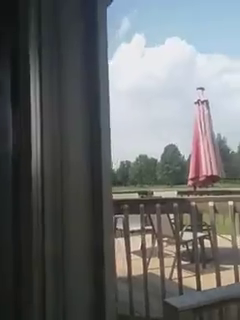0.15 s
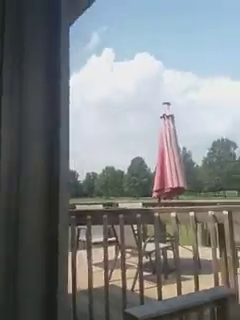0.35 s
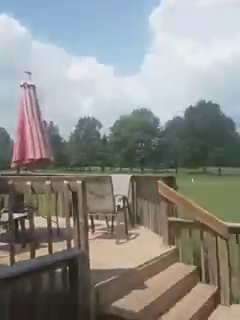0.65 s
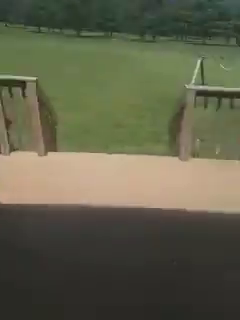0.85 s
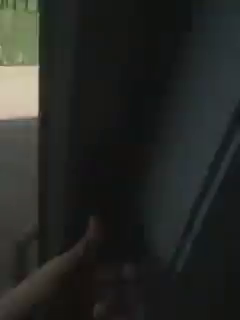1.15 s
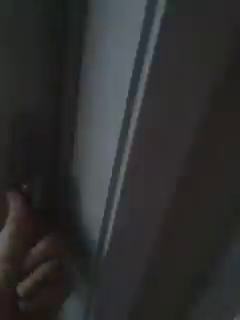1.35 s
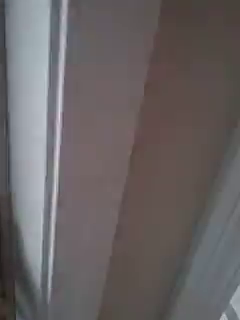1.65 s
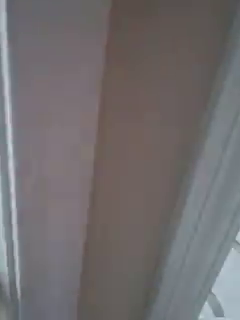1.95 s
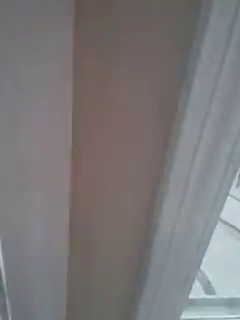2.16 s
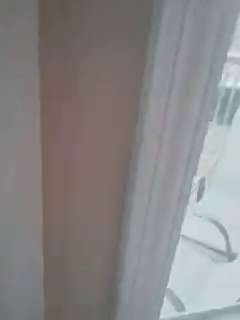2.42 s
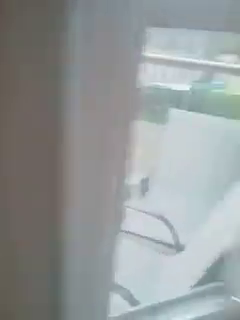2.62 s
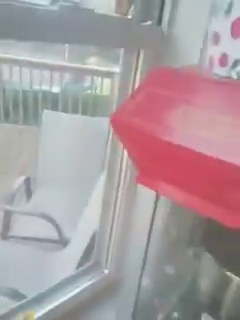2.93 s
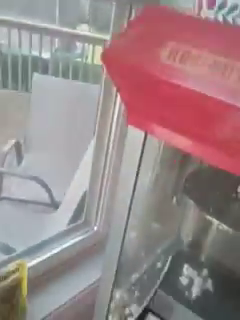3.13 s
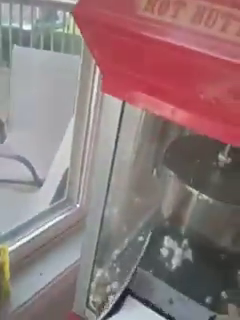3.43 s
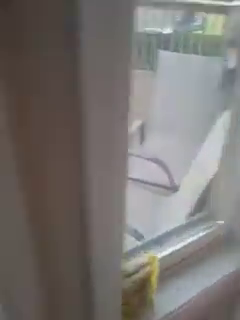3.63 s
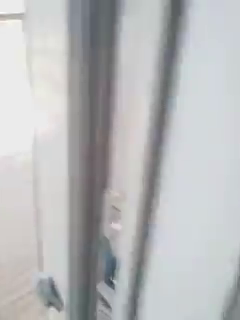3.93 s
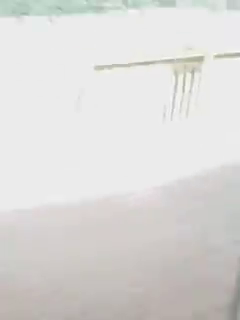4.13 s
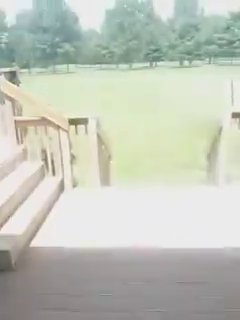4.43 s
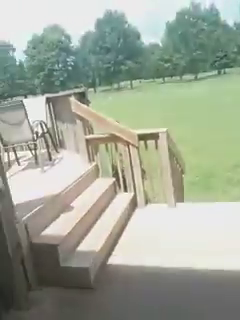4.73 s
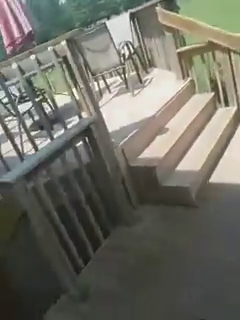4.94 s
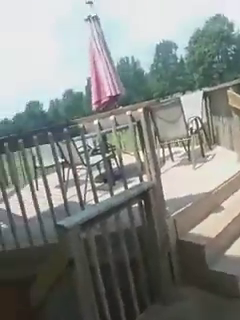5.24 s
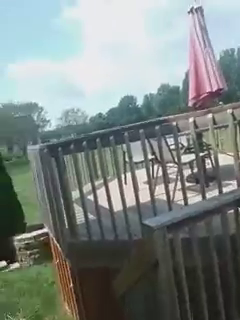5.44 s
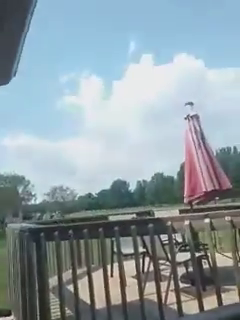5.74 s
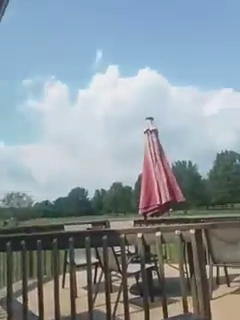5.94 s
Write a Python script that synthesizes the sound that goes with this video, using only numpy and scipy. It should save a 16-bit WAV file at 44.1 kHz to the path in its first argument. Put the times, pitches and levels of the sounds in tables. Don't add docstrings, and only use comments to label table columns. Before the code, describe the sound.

Handheld, close stereo microphone in a furnished room with low hum and hiss. A sleeve swishes and fingers click at a latch; a sliding glass door bangs into its frame, the pane booming before the latch catches and the sound is cut off. After a pause it is pushed, cracks free, rolls grittily with low jolts, and squeaks against a rubber bumper. Outside, faint leaves, twig ticks and soft wind thumps follow.

```python
import sys
import numpy as np
from scipy import signal
from scipy.fft import rfft, irfft
from scipy.io import wavfile
from scipy.ndimage import uniform_filter1d

SR = 44100
rng = np.random.default_rng(int(sys.argv[2]) if len(sys.argv) > 2 else 0)


def magnitude_from_level(level_db):
    exponent = np.asarray(level_db, float) / 20
    return 10 ** exponent


def output_pcm(signal):
    pcm = np.clip(np.atleast_2d(signal).T, -1, 1) * 32767
    wavfile.write(sys.argv[1], SR, np.round(pcm).astype(np.int16))


N = 267907
TIME = np.arange(N) / SR

# (frequency [Hz], density [dB/Hz])
AIR_SPECTRUM = [(18, -49), (30, -21.5), (124, -4.5), (227, -7.5), (252, -18.5), (295, -7), (384, -13),
                (449, -15), (702, -17.5), (1070, -18), (2410, -22.5), (3060, -32.5), (14800, -32),
                (16000, -34.5)]
# (frequency [Hz], level [dB])
RUSTLE_SPECTRUM = [(600, -20), (1200, -3), (2500, -0.5), (3600, -5), (4700, -3.5), (6500, -12),
                   (12000, -35)]
# (frequency [Hz], level [dB])
WHINES = [(13001, -96), (14002, -96), (14998, -85)]
# (frequency [Hz], left-right likeness [-1..1])
LIKENESS = [(60, 0.75), (180, 0.99), (550, 0.28), (1650, -0.11), (4970, -0.0085), (15000, -0.092)]
# (frequency [Hz], left-right difference [dB])
BALANCE = [(60, 3), (150, -1.0), (380, 0.5), (950, -2), (2380, -4), (5980, 0), (15000, 1)]
# (frequency [Hz], level [dB])
CLICK_SPECTRUM = [(530, -37.5), (900, -0.5), (1450, -1.5), (2000, 0), (3090, 0), (3780, -5), (4450, -2),
                  (5900, -11.5), (7210, -21.5), (9000, -32), (11700, -33), (19800, -120)]
# (frequency [Hz], t60 [s])
ROOM_T60 = [(100, .7), (300, 0.32), (1000, 0.76), (3000, 0.38), (8000, 0.4), (16000, 0.85)]
# (frequency [Hz], width [Hz], level [dB])
PANE_MODES = [(175, 72, 2), (240, 58, 0.5), (302, 21, 1.5), (375, 13, -3.5), (404.6, 11.6, -0.5),
              (483, 27, -3.5), (640, 150, -7.5)]
# (frequency [Hz], width [Hz], level [dB])
DEEP_MODES = [(53.2, 18.6, -19), (85, 23, -2), (121.4, 17.6, 0.5)]
# (frequency [Hz], level [dB])
TRACK_SPECTRUM = [(380, -29), (640, -7.5), (801, -3), (1030, -2.5), (1110, -3.5), (1480, -8), (1920, -8),
                  (2530, -9), (3600, -23.5), (4680, -31), (7920, -120)]
# (frequency [Hz], level [dB])
SEAL_SPECTRUM = [(1880, -11), (3200, -1), (3350, 0.5), (4470, 2.5), (6080, -4), (6710, -12), (8500, -32),
                 (11000, -63), (18700, -120)]
# (frequency [Hz], level [dB])
THIN_SPECTRUM = [(7000, 4.5), (9000, 2), (16000, -1)]
# (frequency [Hz], level [dB])
BUMPER_SPECTRUM = [(600, -20), (850, -1), (1650, -9.5), (2500, 0), (3300, -13), (4100, -11), (5100, -8),
                   (5900, -30), (6600, -20), (7400, -34), (8000, -27), (10000, -40)]
# (frequency [Hz], level [dB])
DRAG_SPECTRUM = [(350, -25), (600, -10), (882, -2), (2040, -2), (2230, -2.5), (2650, -5.5), (4070, -7),
                 (9000, -36.5), (11700, -57), (19800, -120)]
# (frequency [Hz], level [dB])
WIND_SPECTRUM = [(30, -3), (60, 0.5), (130, -0.5), (250, -9.5), (450, -18), (800, -34), (2000, -53)]

# (start [s], level [dB], fade t60 [s], treble above it [dB])
SWISHES = [
    (.63, -63, 2.7, -4),
    (.95, -73, 1.9, 6.5),
    (1.25, -66.5, 2.4, -18),
    (3.06, -66, 1.4, -3),
    (5.15, -75, 1.4, 8),
    (5.65, -86, 3, -6),
]
# (start [s], level above hum [dB], fade t60 [s])
HUM_SWELL = [
    (5.78, 8.9, 9),
]
# (time [s], peak [dB], ring [Hz], hardness [dB], left-right [dB])
LATCH = [(0.5043, -43, 2680, -36, -21), (0.5606, -24, 2200, -34.5, -37), (0.5713, -44, 2830, -24, -22),
         (1.1475, -37.5, 4550, -36, 2), (1.226, -42.5, 2570, -17, -2), (1.307, -39.5, 3040, -21, 5),
         (1.3399, -39, 3000, -25, -1), (1.5031, -27, 1880, -41.5, -3), (1.509, -26, 4230, -30, 23),
         (1.5178, -30.5, 1700, -28, -1), (1.5597, -44.5, 1900, -25, -4), (1.6034, -33, 3200, -29.5, -17),
         (1.6095, -25, 1630, -13.5, -2), (1.6608, -30, 4700, -21, 16), (1.6876, -31, 2820, -27, -1),
         (1.7304, -30.5, 2740, -20.5, 0), (1.776, -27.5, 2560, -21.5, -2.5), (1.7885, -31.5, 2380, -35, -7)]
# (time [s], peak [dB], ring [Hz], hardness [dB], left-right [dB])
SLAM = [
    (1.9165, -30, 2860, -20.5, -5),
    (1.952, -5, 2770, -36, -6),
    (1.9568, -18, 1940, -11.5, 23),
    (1.9946, -17, 2030, -33, -2.5),
]
# (time [s], peak [dB], ring [Hz], hardness [dB], left-right [dB])
CATCH = [
    (2.0945, -11.5, 1940, -49, -5.5),
    (2.103, -29, 1940, -20, -2),
    (2.1169, -25, 1970, -36, 14),
    (2.201, -28.5, 2362, -52, -1),
    (2.372, -41.5, 2800, -21, 5),
]
# (time [s], peak [dB], ring [Hz], hardness [dB], left-right [dB])
RAIL = [
    (3.0684, -28.5, 1810, -13, -3),
    (3.358, -40, 1580, -40, -2),
    (3.4803, -26, 2220, -14, 14),
    (3.4871, -21, 2400, -24, 1.5),
    (3.5009, -19.5, 1600, -19, 0),
    (3.5687, -18, 5000, -20, -8),
    (3.5774, -23.5, 2130, -11, 3.5),
    (4.1342, -24.5, 1920, -29, 4),
    (4.2322, -30, 3900, -8, -3),
    (4.3331, -29, 3000, -27, 0.5),
]
# (time [s], peak [dB], ring [Hz], hardness [dB], left-right [dB])
DECK = [
    (4.7523, -36.5, 2790, -15, -16),
    (4.9425, -27.5, 2970, -20, -11),
    (5.474, -42.5, 4000, -26, -9),
]
ROOM_SEND_DB = [-13.5, -4, -20.5, -4]
# (time [s], peak [dB], frequency [Hz], t60 [s], left-right [dB])
RINGS = [(.568, -47, 2600, 0.026, -19), (.577, -44, 3300, 0.027, -15), (1.66, -47, 2310, 0.015, 0),
         (1.792, -41, 708, 0.057, 1), (1.806, -44.5, 960, 0.042, 4), (1.917, -44.5, 700, 0.056, -2),
         (1.9525, -17, 5700, 0.015, -1), (1.953, -23, 4600, .03, 0), (1.956, -22, 3030, .025, -7),
         (1.957, -21, 1047, 0.036, 0.5), (1.968, -27, 4500, .02, 0), (1.978, -27, 4000, 0.024, 0),
         (1.995, -24, 4770, 0.023, 0), (2.094, -22, 2820, 0.013, -7), (2.102, -31, 1980, .03, -4),
         (2.105, -35, 4760, .02, 2), (2.131, -27.5, 1880, 0.027, -6), (2.132, -40, 3000, 0.018, 0),
         (3.07, -40, 4770, 0.017, 0.5), (3.069, -41, 3890, 0.017, -4), (3.07, -44.5, 6400, .015, 1),
         (3.073, -46, 4740, .02, 0), (3.085, -48.5, 194, .2, 0), (3.496, -29, 890, 0.085, 1),
         (3.682, -37, 1100, .04, -6), (3.735, -33, 1034, 0.049, 1), (3.795, -36, 1100, .08, -4),
         (3.827, -25.5, 1073, 0.065, -6), (3.887, -42, 1110, .04, -6), (3.9, -32, 334, 0.11, -3),
         (3.922, -30, 295, .12, -2), (3.985, -29.5, 254, .08, -1), (4.07, -31, 980, .04, -4),
         (4.075, -34, 403, .08, -2), (4.135, -26.5, 957, 0.045, -4), (4.232, -35.5, 2216, .05, -3),
         (5.22, -54, 1710, .04, 1), (1.34, -49, 790, 0.026, 0), (1.39, -52, 800, 0.035, 0),
         (1.43, -51, 900, 0.025, 0), (1.953, -22.5, 6400, 0.019, -5.5)]
# (start [s], boom [dB], fade t60 [s], deepest modes above it [dB])
JOLTS = [(1.505, -56.5, 2.2, -15), (1.63, -59, 0.9, -17), (1.76, -45.5, 0.2, -2), (1.948, -32.5, 0.75, 1.5),
         (2.03, -43.5, 1.33, 4), (3.07, -55.5, 0.64, -14), (3.484, -36.5, 0.53, -2), (3.56, -47, 0.57, -1),
         (3.64, -42, 0.83, -3.5), (3.75, -40, 0.98, -5), (3.82, -34, 0.083, -7), (3.885, -36.5, 0.85, -25),
         (4.06, -35, 0.16, -15), (4.12, -36.5, 1.07, -24), (4.32, -43, 0.74, -8), (4.5, -50, 0.64, -5)]
# (time [s], level [dB])
SPEED = [
    (3.25, -26),
    (3.4, -17),
    (3.476, -8),
    (3.618, -8),
    (3.826, 0),
    (4.16, -1.5),
    (4.25, -5.5),
    (4.34, -10.5),
    (4.48, -16.5),
    (4.62, -46),
]
# (start [s], length [s], boom lost [dB], change [dB])
SKIPS = [
    (3.7, 0.029, -2, 3),
    (3.86, 0.025, -0.5, 2),
]
# (start [s], level [dB], fade t60 [s], fizz above it [dB])
CHATTER = [
    (1.953, -33.5, 0.37, -14.5),
    (1.9, -58, 0.067, -40),
    (2.085, -55, 2.6, -5.5),
    (3.478, -36.5, 0.54, -9),
]
# (start [s], length [s], level [dB], change [dB])
SCUFFS = [
    (4.228, 0.041, -55.5, -2),
    (4.87, 0.041, -61, 0),
    (4.955, 0.071, -58, -1.8),
    (5.495, 0.027, -64.5, 0),
]
# (frequency [Hz], peak [dB], t60 [s], delay [s])
GLASS = [(59.3, -30, 0.4, 0.016), (119, -41, 0.97, 0.0117), (176.5, -19, 0.26, 0.0044),
         (206.5, -28, 1, 0.0203), (291, -16.5, 0.58, 0.00807), (307, -15.5, 0.53, 0.0078),
         (367, -21.5, 0.43, 0.00269), (404, -48, 0.46, 0.0035), (470, -27, 0.17, 0.0028)]
# (start [s], length [s], added ring [dB], change [dB])
REBOUND = [
    (1.992, .034, -3, -5),
]
# (middle [s], peak [dB], frequency [Hz], cycles [count], left-right [dB])
PUFFS = [(4.281, -23.5, 89, 5, 36), (4.33, -33, 76, 7.9, 34), (4.428, -24, 102, 1.8, 23),
         (4.864, -21, 103.6, 2.1, -41), (4.902, -43, 69, 6.2, -23), (4.933, -33.5, 87.7, 6.2, 25),
         (4.961, -51, 85, 5.2, -3), (5.38, -28, 79.5, 2.5, -33), (5.44, -38.5, 69, 9.2, -25),
         (5.471, -30, 123, 1.8, -22), (5.504, -41, 65, 2.8, -20), (5.689, -54, 89, 4.2, 21),
         (5.774, -53, 75, 3.7, 9), (5.88, -21.5, 77, 2.7, -39), (5.913, -41.5, 75, 5.6, -17),
         (5.986, -41, 89, 1.9, -16)]
# (start [s], length [s], level [dB], change [dB])
GUSTS = [
    (4.83, .17, -40.5, -12),
    (5.345, 0.19, -52.5, 7.5),
    (5.845, .11, -42, -12),
    (5.93, .2, -56.5, -4),
]
# (time [s], level [dB], slip rate [Hz])
SQUEAK = [
    (4.494, -48, 800),
    (4.498, -31, 900),
    (4.504, -28, 878),
    (4.516, -29, 780),
    (4.523, -29, 836),
    (4.528, -31, 915),
    (4.532, -36, 880),
    (4.536, -31, 845),
    (4.543, -35, 880),
    (4.551, -55, 850),
]
# (start [s], level [dB], fade t60 [s])
DRAG = [
    (4.493, -29, 0.28),
    (4.532, -34.5, 0.067),
    (4.548, -36.5, 0.15),
    (4.559, -27, 0.14),
    (4.575, -32, 0.054),
    (4.655, -52, 0.83),
]
# (start [s], length [s], level [dB], change [dB])
SLOWING = [
    (4.59, 0.079, -37.5, -4),
]

STEP_OUT_S, STEP_LENGTH_S = 3.8, 0.64
BANG_S, LOWER_S, SETTLE_S = 1.953, 1.9, 2.4
FREE_S = 3.478
SWISH_RISE_S, JOLT_RISE_S, CHATTER_RISE_S = 0.093, 0.021, 0.003
CLICK_LEAD = 64


def evened(x):
    mid = np.reshape(x, (-1, x.shape[-1])).mean(0)
    return x / np.sqrt(np.mean(mid ** 2) + 1e-20)


def read(points, hz):
    f, value = np.transpose(points)
    return np.interp(np.log(hz + 1), np.log(f + 1), value)


def curve(rows, column=1, rest=-130.):
    rows = np.array(rows)
    return np.interp(TIME, rows[:, 0], rows[:, column], left=rest, right=rest)


def level(db):
    return uniform_filter1d(magnitude_from_level(db), 90)


def pan(left_right_db):
    return magnitude_from_level(np.minimum([[left_right_db], [-left_right_db]], 0))


def coloured(x, points):
    n = x.shape[-1]
    closed = [(points[0][0] * .6, -90)] + list(points) + [(points[-1][0] * 1.4, -90)]
    return irfft(rfft(x) * magnitude_from_level(read(closed, np.fft.rfftfreq(n, 1 / SR))), n)


def butter(x, order, hz, kind="low", both_ways=False):
    run = signal.sosfiltfilt if both_ways else signal.sosfilt
    return run(signal.butter(order, hz, kind, fs=SR, output="sos"), x)


def pair(x, other):
    hz = np.fft.rfftfreq(len(x), 1 / SR)
    same = np.clip(read(LIKENESS, hz), -1, 1)
    lean = magnitude_from_level(read(BALANCE, hz) / 2)
    a, b = rfft(x), rfft(other)
    right = same * a + np.sqrt(1 - same ** 2) * b
    return irfft(np.array([a * lean, right / lean]), len(x))


def patchy(patchy_db, flicker_db):
    z = signal.stft(pair(*rng.standard_normal((2, N))), nperseg=512, noverlap=384)[2]
    patches = uniform_filter1d(rng.standard_normal(z.shape[1:]), size=6, axis=0)
    patches = uniform_filter1d(patches, size=16, axis=1)
    flicker = uniform_filter1d(rng.standard_normal(z.shape[2]), size=3)
    z = z * magnitude_from_level(patchy_db * patches / patches.std() + flicker_db * flicker / flicker.std())
    return signal.istft(z, nperseg=512, noverlap=384)[1][:, :N]


def grit(per_s, spread_db):
    size, chance, sign = rng.random((3, N))
    return magnitude_from_level(-spread_db * np.log(size + 0.0056)) * (chance < per_s / SR) * np.sign(sign - .5)


def jolts(rows, rise_s, second=False):
    rows = np.array(rows)
    start, t60 = rows[:, :1], rows[:, 2:3]
    t = TIME - start
    db = rows[:, 1:2] + (rows[:, 3:4] if second else 0) - 60 * np.maximum(t - rise_s, 0) / t60
    held = np.where(start < SETTLE_S, np.clip((SETTLE_S - TIME) / 0.023, 0, 1), 1)
    return np.sqrt(((magnitude_from_level(db) * np.clip(t / rise_s, 0, 1) * held) ** 2).sum(0))


def spells(rows, edge_s):
    s, length, db, change_db = np.transpose(rows)[:, :, None]
    t = TIME - s
    edges = np.clip(np.minimum(t, length - t) / edge_s, 0, 1)
    return (magnitude_from_level(db + change_db * np.clip(t / length, 0, 1)) * edges).sum(0)


def room(x):
    hz, t, z = signal.stft(pair(*rng.standard_normal((2, SR))), SR, nperseg=512)
    t60 = np.maximum(read(ROOM_T60, hz), .05)[:, None]
    tail = signal.istft(z * magnitude_from_level(-60 * t / t60), SR, nperseg=512)[1]
    tail = tail * np.clip(np.arange(tail.shape[1]) / SR / 0.016, 0, 1)
    return signal.fftconvolve(x[None], tail / np.linalg.norm(tail[1]), axes=1)[:, :N]


def shaken(modes, bumps):
    boom = np.zeros((2, N))
    for hz, width, db in modes:
        r = np.exp(-np.pi * width / SR)
        poles = [1, -2 * r * np.cos(2 * np.pi * hz / SR), r * r]
        boom += magnitude_from_level(db) * evened(signal.lfilter([1, -1], poles, bumps))
    boom = butter(boom, 4, 1.25 * modes[-1][0])
    return boom / np.sqrt(uniform_filter1d(boom.mean(0) ** 2, 3000))


def air():
    out = np.clip((TIME - STEP_OUT_S) / STEP_LENGTH_S, 0, 1)
    hum_db = 1.5 - 7.5 * out
    rustle_db = -71.5 - 3 * out
    bright_db = -9 + 18 * out
    still = magnitude_from_level(-63) * evened(coloured(patchy(patchy_db=1.2, flicker_db=.4), AIR_SPECTRUM))
    hum = butter(still, 2, 550, both_ways=True)
    rustle = evened(coloured(patchy(patchy_db=2.2, flicker_db=1.2), RUSTLE_SPECTRUM))
    top = butter(rustle, 2, 3500, "high", both_ways=True)
    hum_gain = magnitude_from_level(hum_db) + jolts(HUM_SWELL, 0.36) - 1
    body_gain = np.hypot(magnitude_from_level(rustle_db), jolts(SWISHES, SWISH_RISE_S))
    top_gain = np.hypot(magnitude_from_level(rustle_db + bright_db), jolts(SWISHES, SWISH_RISE_S, True))
    whine = np.zeros((2, N))
    for hz, db in WHINES:
        whine += magnitude_from_level(db + 7) * np.sin(2 * np.pi * (hz * TIME + rng.random((2, 1)) / 4))
    return still + hum_gain * hum + body_gain * (rustle - top) + top_gain * top + whine


def click(hz, hardness_db):
    n = rng.standard_normal((2, 2048))
    t = np.maximum(np.arange(2048) - CLICK_LEAD, 0) / SR
    rattle = (0.16 * magnitude_from_level(-60 * t / .009) + 0.034 * magnitude_from_level(-60 * t / 0.081)) * (t > 0)
    lag = CLICK_LEAD + 40 + 8 * np.tanh(n[:, :1])
    touch = n * rattle + np.sign(n[:, 1:2]) * np.sinc(np.arange(2048) - lag)
    ring = coloured(touch, [(hz * .6, -16), (hz, 0), (hz * 1.7, -14)])
    ring = signal.lfilter([1], [1, -1.7 * np.cos(2 * np.pi * hz / SR), .85 ** 2], ring)
    crack = evened(coloured(touch, CLICK_SPECTRUM))
    both = magnitude_from_level(np.clip(0.85 * (hardness_db + 31.5), -18, 3)) * crack + 0.83 * evened(ring)
    treble = coloured(touch, THIN_SPECTRUM)
    both = both / abs(both).max(1, keepdims=True) + magnitude_from_level(hardness_db) * treble / abs(treble).max()
    return both, crack[1]


def clicks():
    near, send = np.zeros((2, N + 2048)), np.zeros(N + 2048)
    groups = [LATCH, SLAM, CATCH, RAIL, DECK]
    for group, send_db in zip(groups, list(ROOM_SEND_DB) + [-32]):
        for s, db, hz, hardness_db, pan_db in group:
            both, crack = click(hz, hardness_db)
            both = both * magnitude_from_level(db + 2.0) * pan(pan_db)
            at = round(s * SR) - CLICK_LEAD
            near[:, at:at + 2048] += both
            send[at:at + 2048] += magnitude_from_level(send_db) * crack * both[1].std() / crack.std()
    return near[:, :N] + room(send[:N])


def rings():
    out, t = np.zeros((2, N + 8192)), np.arange(8192) / SR
    for s, db, hz, t60, pan_db in RINGS:
        turn, apart = rng.random(2)
        lag = turn + np.array([[0], [1]]) * (apart - .5) * min(hz / 2500, .6)
        shape = magnitude_from_level(db - 60 * t / t60) * pan(pan_db) * (1 - np.exp(-t * hz / 1.2))
        at = round(s * SR)
        out[:, at:at + 8192] += shape * np.sin(2 * np.pi * (hz * t + lag))
    return out[:, :N]


def pane():
    bumps = pair(*(grit(per_s=260, spread_db=1.5) + 0.12 * rng.standard_normal((2, N))))
    rumble = level(-44 + 0.34 * curve(SPEED, rest=-300.) - 130 * (TIME < FREE_S))
    boom = np.hypot(rumble, jolts(JOLTS, JOLT_RISE_S))
    deep = np.hypot(magnitude_from_level(-2.5) * rumble, jolts(JOLTS, JOLT_RISE_S, True))
    hop = np.clip(1 - spells(SKIPS, 0.014), 0, 1)
    return (boom * shaken(PANE_MODES, bumps) + deep * shaken(DEEP_MODES, bumps)) * hop


def track():
    grains = pair(grit(per_s=900, spread_db=3.5), grit(per_s=860, spread_db=3.5))
    grind = patchy(patchy_db=1.6, flicker_db=1.5) + 0.1 * evened(grains)
    fizz = patchy(patchy_db=-2.5, flicker_db=1.5)
    speed_db, scuff = curve(SPEED, rest=-300.), spells(SCUFFS, 0.01)
    scrape = np.hypot(level(-41 + speed_db), jolts(CHATTER, CHATTER_RISE_S)) + scuff
    fizz_db = -58 + np.minimum(0.19 * speed_db, speed_db + 12.5)
    brush = np.hypot(level(fizz_db), jolts(CHATTER, CHATTER_RISE_S, True)) + magnitude_from_level(-4.5) * scuff
    seal = evened(coloured(fizz, SEAL_SPECTRUM)) + magnitude_from_level(-13) * evened(coloured(fizz, THIN_SPECTRUM))
    rolling = (TIME > 3) & (TIME < 4.6)
    rolled = evened(coloured(grind, TRACK_SPECTRUM))
    rattled = evened(coloured(grind, CLICK_SPECTRUM))
    return scrape * np.where(rolling, rolled, rattled) + brush * seal


def bang():
    out = np.zeros(N)
    for hz, db, t60, delay in GLASS:
        t = np.maximum(TIME - BANG_S - delay, 0)
        out += magnitude_from_level(db - 60 * t / t60) * (1 - np.exp(-t / 0.0054)) * np.sin(2 * np.pi * hz * t)
    lowered = magnitude_from_level(-6.5 * np.clip((TIME - LOWER_S) / 0.0099, 0, 1))
    settled = np.clip((SETTLE_S - TIME) / 0.019, 0, 1)
    return out * (1 + spells(REBOUND, 0.008)) * settled * lowered * magnitude_from_level([[-.6], [.6]])


def wind():
    out = np.zeros((2, N))
    for s, db, hz, cycles, pan_db in PUFFS:
        u = np.clip((TIME - s) * hz / cycles, -1, 1)
        phase = 2 * np.pi * (.19 + cycles * (u - u ** 2 / cycles ** 2))
        puff = np.exp(-7 * u ** 2) * (np.cos(phase) + 0.23 * np.cos(2 * phase)) * (abs(u) < 1)
        out += magnitude_from_level(db) * pan(pan_db) * puff
    lumps = np.array([grit(per_s=500, spread_db=3), grit(per_s=500, spread_db=3)])
    lumps = evened(coloured(lumps, WIND_SPECTRUM))
    return out + spells(GUSTS, .025) * lumps * magnitude_from_level([[-8], [0]])


def squeak():
    hz, grip_db = curve(SQUEAK, column=2, rest=800.), curve(SQUEAK)
    rough = np.clip(.08 + .025 * (grip_db.max() - grip_db), 0, .5)
    turns = np.cumsum(hz * (1 + .06 * uniform_filter1d(rng.standard_normal(N), 60))) / SR
    slips = np.zeros((2, N))
    for k in range(1, 13):
        slips += np.cos(2 * np.pi * (k * turns + rng.random() + .2 * rng.random((2, 1))))
    drive = (1 - rough) * evened(slips) + rough * evened(rng.standard_normal((2, N)))
    tone = evened(coloured(drive, BUMPER_SPECTRUM)) * magnitude_from_level(grip_db - 4) * magnitude_from_level([[-1.5], [1.5]])
    rasp = patchy(patchy_db=1.0, flicker_db=1.0)
    body = magnitude_from_level(-3.5) * evened(coloured(rasp, DRAG_SPECTRUM))
    thin = magnitude_from_level(-29.5) * evened(coloured(rasp, THIN_SPECTRUM))
    return tone + np.hypot(jolts(DRAG, 0.0053), spells(SLOWING, 0.018)) * (body + thin)


def scene():
    return air() + clicks() + rings() + pane() + track() + bang() + wind() + squeak()


def top_cut(x):
    return signal.sosfilt(signal.butter(12, 16490, fs=SR, output="sos"), x)


def record(dry):
    thin = butter(dry, 2, 45, "high")
    limited = signal.oaconvolve(thin, signal.firwin(401, 15750, fs=SR)[None], "same")
    return top_cut(limited - .0005)


dry = scene()
out = record(dry)
output_pcm(out)
```